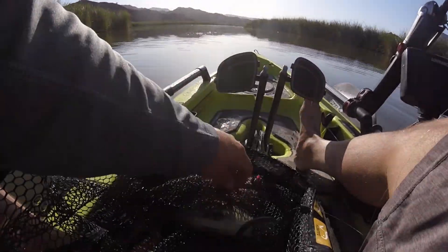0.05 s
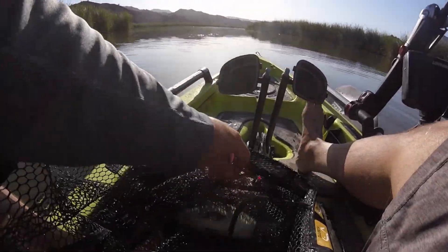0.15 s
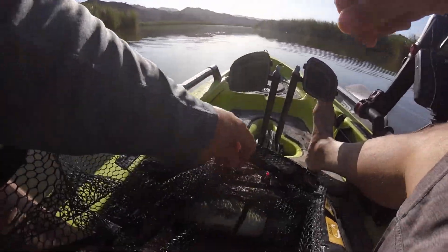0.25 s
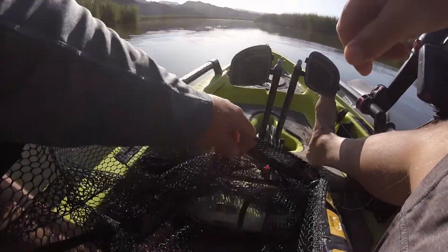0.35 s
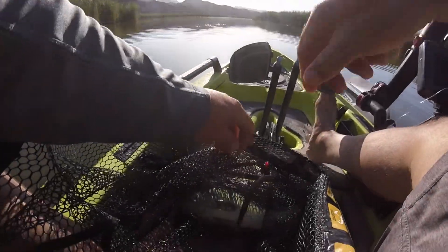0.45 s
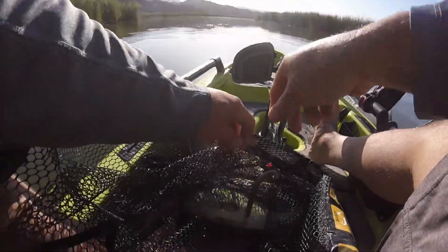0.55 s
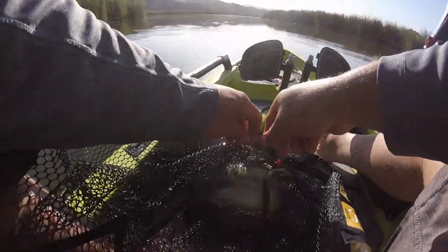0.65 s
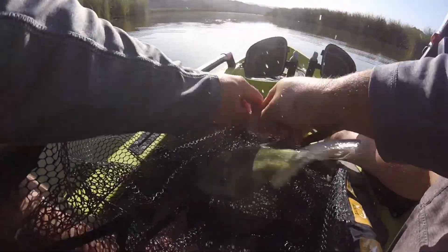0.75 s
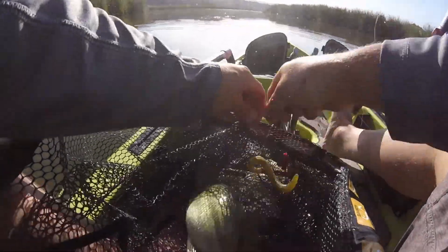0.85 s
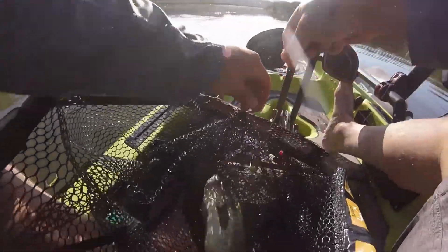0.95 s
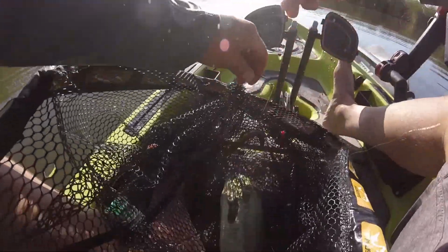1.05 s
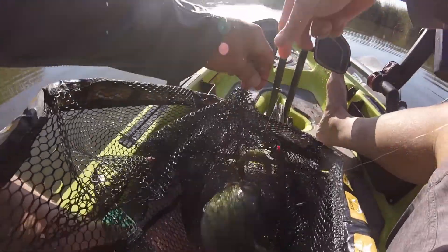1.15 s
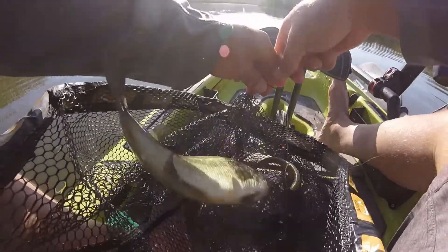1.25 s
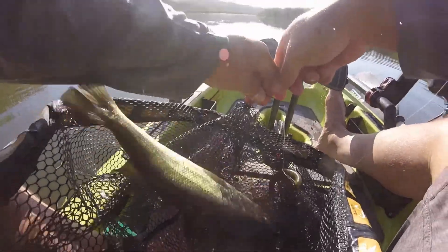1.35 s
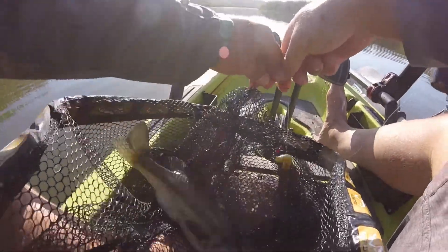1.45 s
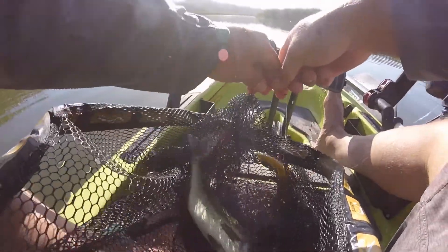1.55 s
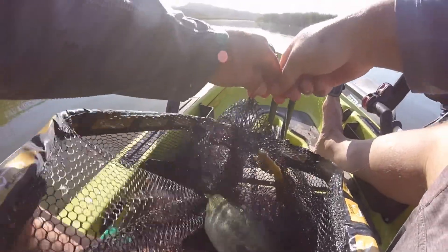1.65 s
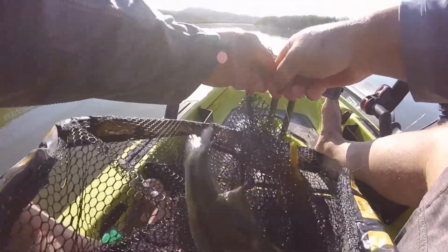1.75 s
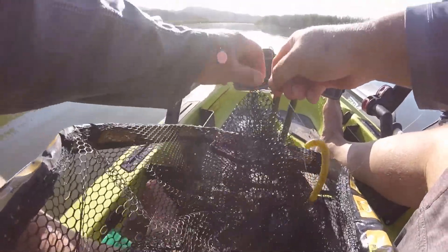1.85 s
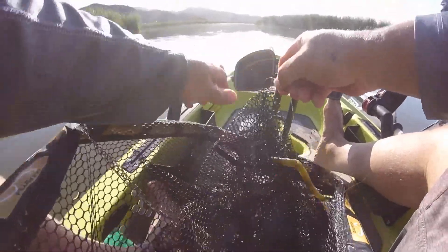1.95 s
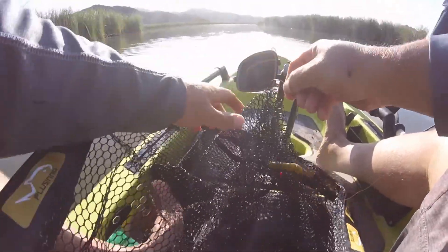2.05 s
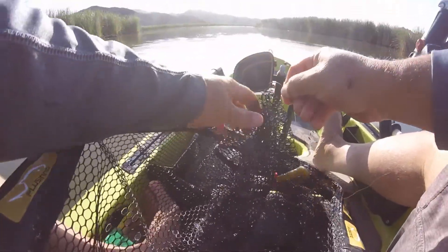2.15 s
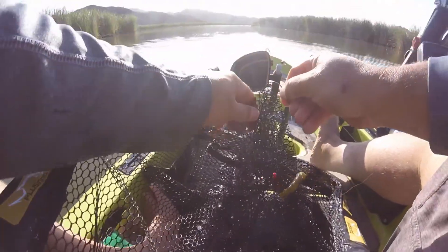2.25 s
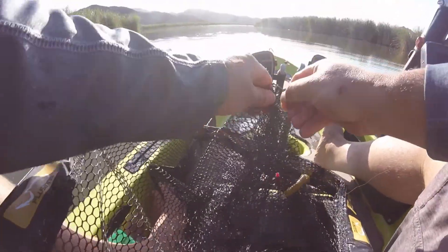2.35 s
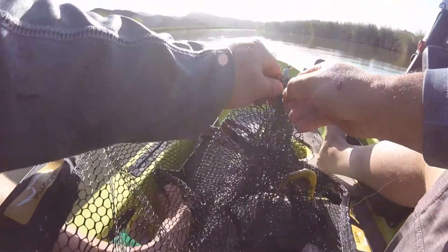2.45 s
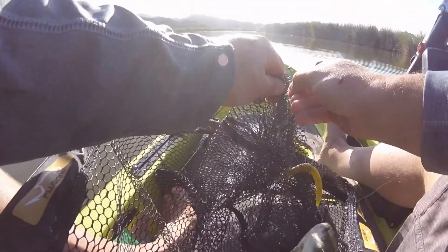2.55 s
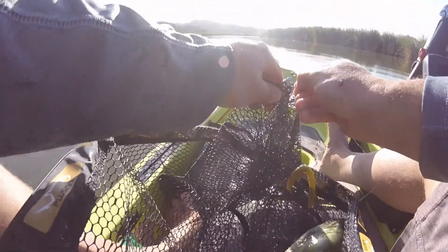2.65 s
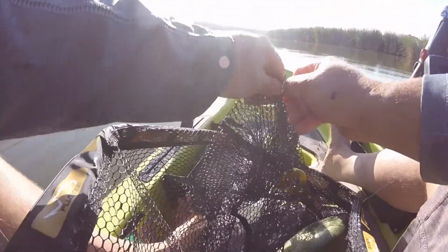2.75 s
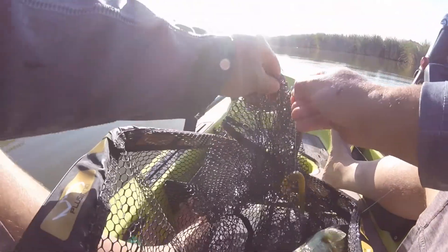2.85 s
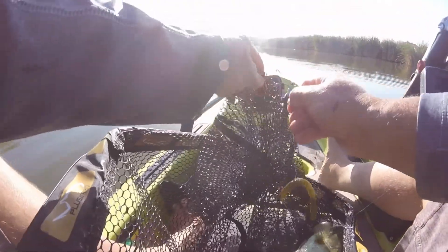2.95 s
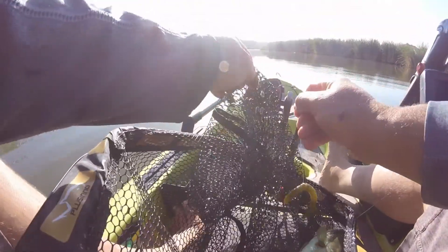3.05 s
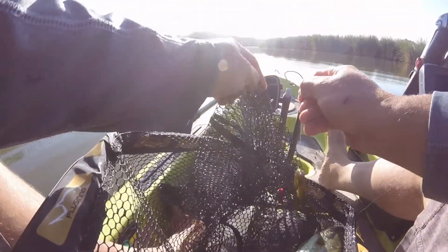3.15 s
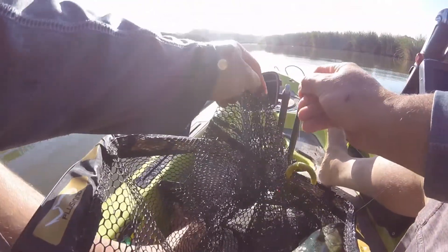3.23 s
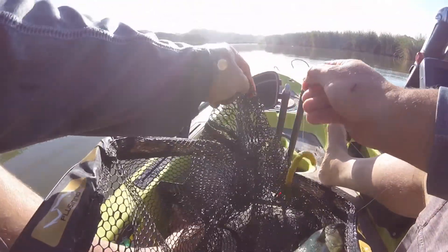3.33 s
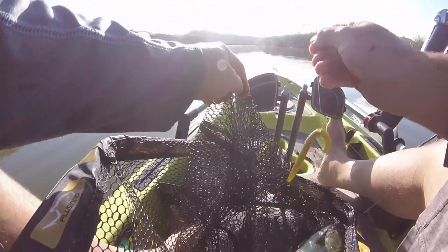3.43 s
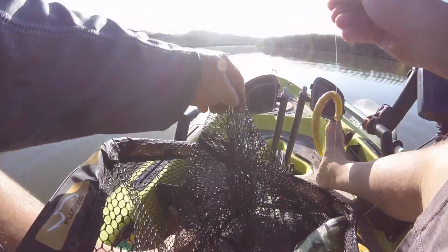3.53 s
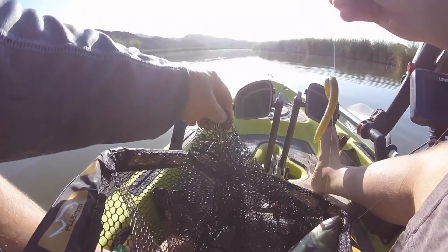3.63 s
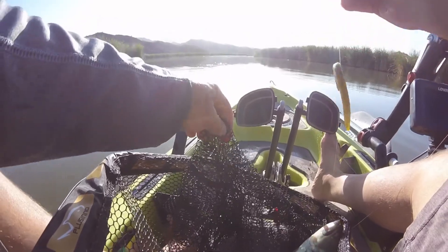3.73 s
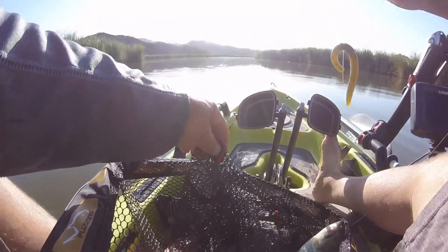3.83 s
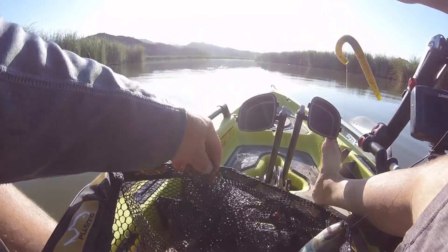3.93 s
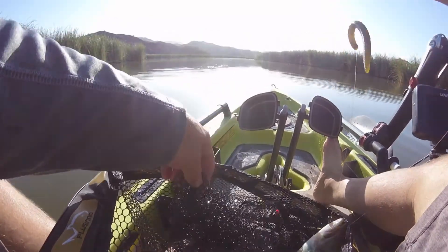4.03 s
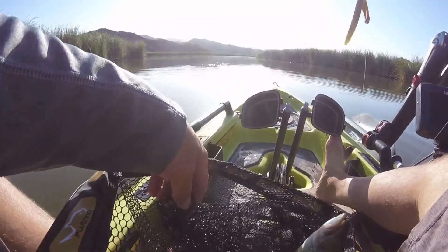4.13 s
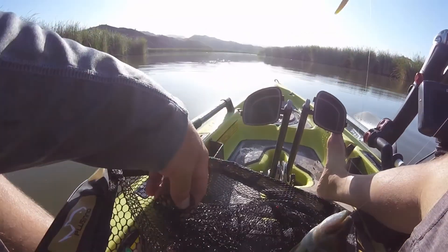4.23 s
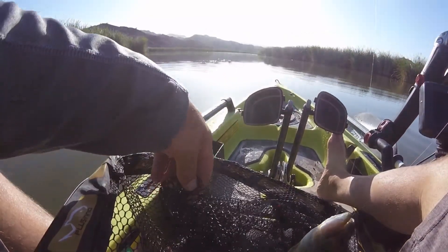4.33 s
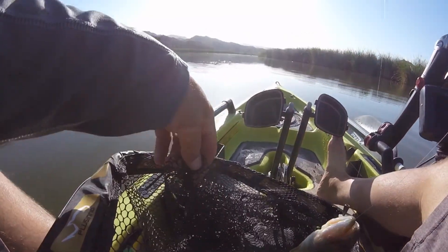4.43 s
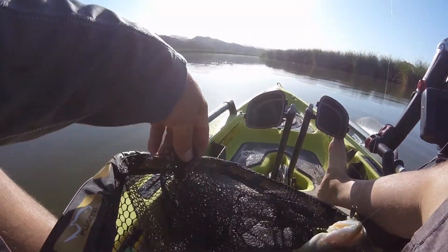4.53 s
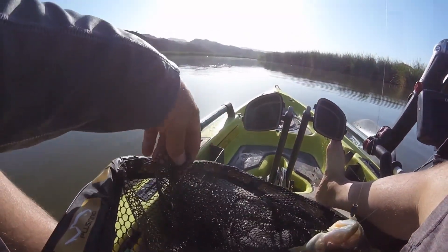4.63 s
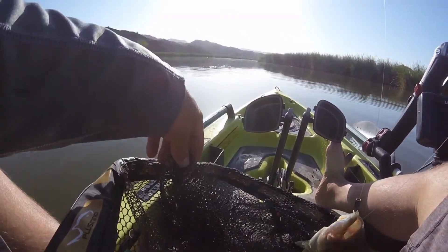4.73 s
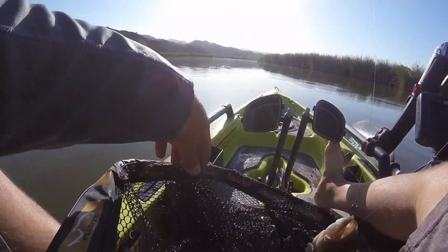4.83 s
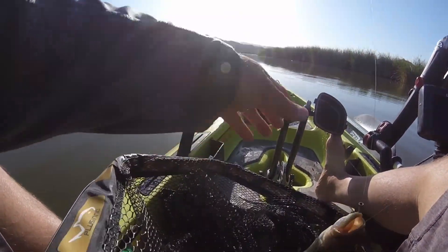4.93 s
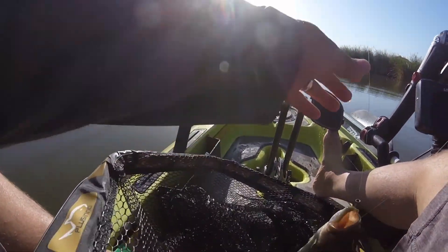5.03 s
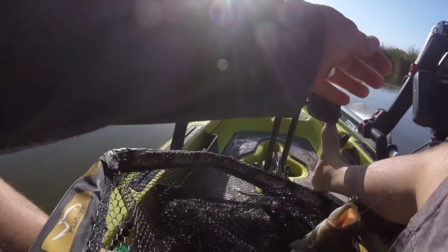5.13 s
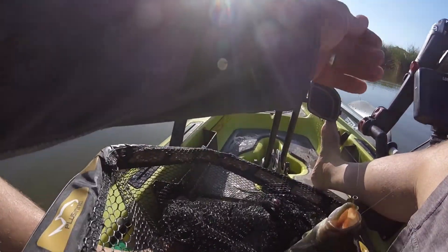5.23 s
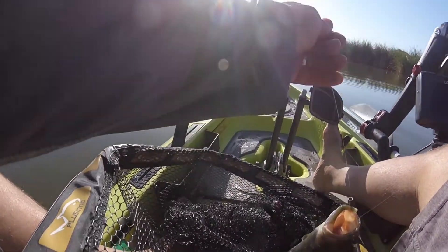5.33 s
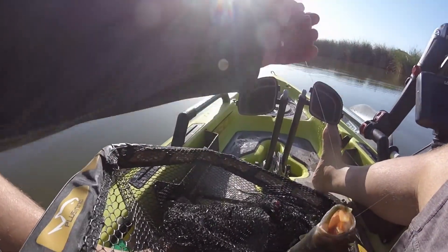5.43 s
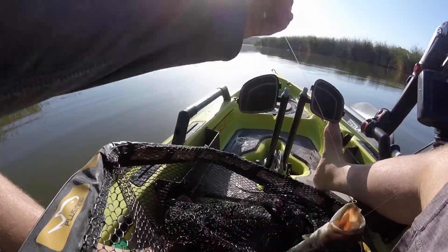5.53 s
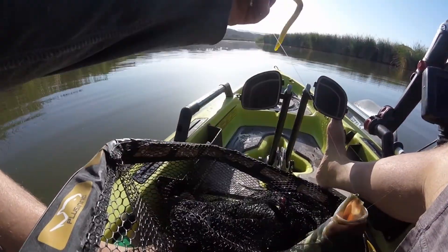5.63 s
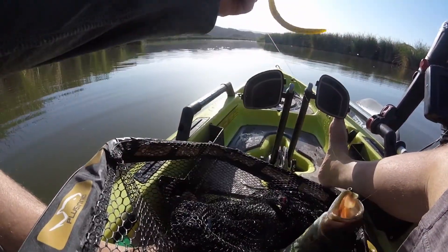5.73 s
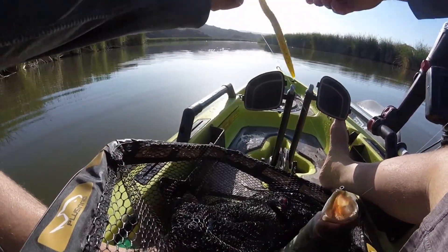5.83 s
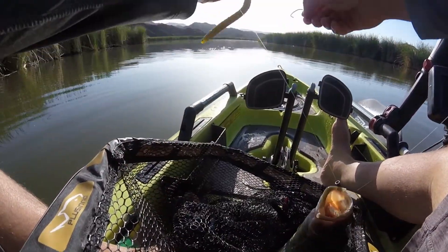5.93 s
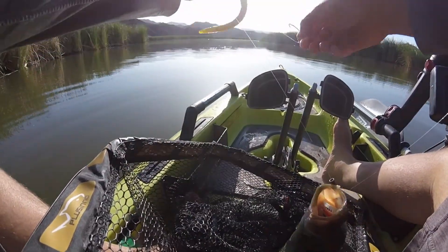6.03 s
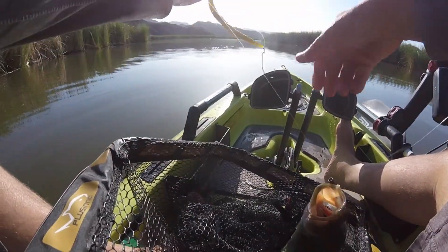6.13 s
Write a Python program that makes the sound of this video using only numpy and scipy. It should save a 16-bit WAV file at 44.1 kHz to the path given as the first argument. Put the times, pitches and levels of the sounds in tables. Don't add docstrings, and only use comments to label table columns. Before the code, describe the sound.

Outdoors on calm water, a close microphone in a sealed housing gives a dull, bass-heavy sound with faint hiss, low wind rumble and rocking wash throughout. For the first 0.7 s there is mainly this bed, quiet net rustle and faint taps. At 0.76 s a fish slams the hollow plastic hull: hard knock, wet slap, short low boom and snapping mesh. More blows follow at about 0.95, 1.07, a very hard one at 1.26, then 1.59 and 1.77, with scuffing and wet netting crackle between. Heavy thuds come near 2.05 s, lighter flaps at 2.35 to 2.55, and a great double slam at 2.73 to 2.76. Afterwards it is calm: sparse ticks, soft mesh drag, and water gurgling around 3.2 to 3.7 s. A softer flop and scrabble land at 4.9 to 5.2 s, then rounder glugs and gusty wind continue to the end at about 6.2 s.

```python
import sys
import numpy as np
from scipy import signal
from scipy.fft import rfft, irfft
from scipy.io import wavfile
from scipy.ndimage import uniform_filter1d, minimum_filter1d

SR = 44100
rng = np.random.default_rng(int(sys.argv[2]) if len(sys.argv) > 2 else 0)


def undo_db(level):
    steps = np.asarray(level, float) / 20
    return 10 ** steps


def transcribe(signal):
    frames = np.atleast_2d(signal).T
    limited = np.clip(frames, -1, 1)
    pcm = np.round(limited * 32767).astype(np.int16)
    wavfile.write(sys.argv[1], SR, pcm)


N = 272582


def unit(x):
    return x / np.sqrt(np.mean(x ** 2))


def add(track, s, sound):
    i = int(s * SR)
    track[i:i + len(sound)] += sound[:N - i]


def peaked(x, db):
    return x * undo_db(db) / np.max(np.abs(x))


def ring(x, hz, t60):
    radius = np.exp(-np.log(1000) / (max(t60, .002) * SR))
    turn = 2 * np.pi * hz / SR
    return signal.lfilter([np.sin(turn)], [1, -2 * radius * np.cos(turn), radius * radius], x)


def resonate(x, hz, width):
    return signal.lfilter(*signal.iirpeak(hz, hz / width, fs=SR), x)


def steep(x, hz, kind):
    return signal.sosfilt(signal.butter(7, hz, kind, fs=SR, output="sos"), x)


def walk(rate):
    hold = int(SR / rate)
    steps = np.repeat(rng.standard_normal(N // hold + 1), hold)
    return unit(uniform_filter1d(uniform_filter1d(steps, hold), hold)[:N])


def curve(table):
    s, db = np.transpose(table)
    return np.interp(np.arange(N) / SR, s, db)


def burst(seconds, ms, rise_ms, scatter_db):
    noise, scatter = rng.standard_normal((2, int(SR * seconds)))
    t = np.arange(len(noise)) / SR * 1000
    rise = 1 - np.exp(-t / max(rise_ms, .05))
    return noise * undo_db(scatter_db * scatter) * rise * np.exp(-t / max(ms, .1))


# (f/Hz, width/Hz, level/dB)
HOUSING_MODES = [
    (1488, 347, 9.5),
    (2504, 350, 5),
    (3300, 960, -0.5),
    (3730, 514, 6.5),
    (5260, 1050, 1),
    (5950, 1340, 2.5),
    (7430, 1300, -5.5),
    (9870, 1400, 5.5),
    (11080, 1540, 5),
    (12900, 1800, 1),
]


def housing(x, dull_db=0., bright_db=0., top_db=0., throat_db=0.):
    share_db = np.repeat([dull_db, throat_db, 0, bright_db, top_db], [1, 1, 2, 3, 3])
    out = 0
    for k, (hz, width, db) in enumerate(HOUSING_MODES):
        leak = resonate(resonate(x, hz, width), hz, 4.9 * width)
        out = out + (-1) ** k * undo_db(db + share_db[k]) * leak
    return out


# (t/s, level/dB)
BREEZE = [(0, -9), (.33, -4), (.62, -5.5), (.95, -2), (1.2, -4.5), (2.22, -0.5), (2.67, -2.5), (2.82, -6.5),
          (3.2, -1.5), (4.44, 1.5), (4.77, -1), (5.3, 3), (5.87, -2), (6.18, -1)]
# (t/s, level/dB)
ROCKING = [(0, 0.5), (.76, -1.5), (.88, 12.5), (1.36, 4), (1.58, 3.5), (1.7, 9.5), (2.08, 0.5), (2.22, 8.5),
           (2.67, 6.5), (3.01, 4), (3.2, 4.5), (3.5, 1), (4.06, 1.5), (4.44, 2), (4.77, 2), (5.06, 4.5),
           (5.3, 1), (6.18, 4.5)]
# (f/Hz, level/dB per Hz)
AIR_COLOUR = [(15, -30.5), (25, -3.5), (45, 1), (154, -11), (205, -11), (320, -20), (425, -17.5),
              (485, -22.5), (552, -22), (697, -20), (859, -12), (1480, -43), (3590, -52), (12500, -65),
              (16200, -99), (22000, -120)]
# (f/Hz, level/dB)
WHINE = [
    (9652, -93),
]


def lake():
    breeze_db, rocking_db = curve(BREEZE), curve(ROCKING)
    rumble_db = -40 + 0.82 * breeze_db + rocking_db
    wash_db = -44 + 0.49 * breeze_db + 0.39 * rocking_db
    hum_db = -45 + breeze_db
    hiss_db = -64
    f = np.fft.rfftfreq(N, 1 / SR) + 1e-9
    colour_hz, colour_db = np.transpose(AIR_COLOUR)
    colour = undo_db(np.interp(np.log(f), np.log(colour_hz), colour_db))
    # (low f/Hz, high f/Hz, level/dB, flicker/dB, flickers per s)
    layers = [(11.33, 120, rumble_db, 2.3, 12), (121.3, 650, wash_db, 2.45, 18),
              (641, 1300, hum_db, 1.1, 14), (1314, 14000, hiss_db, 0.24, 19)]
    out = np.zeros(N)
    for low, high, db, flicker_db, rate in layers:
        edges = np.geomspace(low, high, num=4)
        layer = np.zeros(N)
        for a, b in zip(edges, edges[1:]):
            band = irfft(rfft(rng.standard_normal(N)) * colour * (f >= a) * (f < b), N)
            layer += band * undo_db(flicker_db * walk(rate))
        out += unit(layer) * undo_db(db)
    for hz, db in WHINE:
        out += np.sqrt(2) * undo_db(db) * np.sin(2 * np.pi * hz * np.arange(N) / SR)
    return out


# (t/s, peak level/dB, f/Hz, length/ms)
GLUGS = [(3.452, -25, 206, 42), (3.576, -23.5, 207, 50), (3.686, -34, 193, 63), (4.535, -30.5, 199.2, 51),
         (5.421, -25, 181.5, 60), (5.542, -21, 176.6, 57), (5.733, -36.5, 178, 44), (5.981, -31.5, 185, 56),
         (6.142, -21, 195, 24), (0.08, -34, 429, 67), (0.175, -30.5, 408, 17), (3.192, -30.5, 401, 35),
         (3.343, -29, 398, 41), (3.973, -42, 476, 37), (4.1, -33, 425, 23), (4.248, -29, 560, 22),
         (5.302, -31.5, 412, 22), (5.432, -33, 395, 24), (5.816, -27, 343, 12), (5.976, -29, 536, 18),
         (6.117, -29, 549, 53)]


def glugs():
    out = np.zeros(N)
    for s, db, hz, ms in GLUGS:
        t = np.arange(SR // 4) / SR * 1000 / ms
        swell = t * np.exp(-3.5 * t)
        tone = np.sin(2 * np.pi * hz * ms / 1000 * t * (.97 + 0.059 * t))
        add(out, s, peaked(swell * tone, db - 8.5))
    return out


# (t/s, level/dB)
DRAG = [(0.0, -64.5), (0.72, -61.5), (0.96, -51), (1.17, -53), (1.31, -54), (1.86, -62.5), (2.22, -54),
        (2.63, -60.5), (2.77, -76), (3.79, -59.5), (4.37, -68), (5.03, -57), (5.42, -66), (6.01, -70),
        (6.18, -71)]
# (t/s, level/dB, length/ms, bright part level/dB)
SPRAY = [(.24, -65, 150, -6), (0.744, -51, 12, -12), (.765, -56, 46, -1), (0.824, -67, 50, 20),
         (.96, -61.5, 33, 1), (1.12, -59.5, 32, -13), (1.274, -48, 40, 1), (1.595, -63.5, 65, -3),
         (1.765, -60.5, 46, 5), (1.799, -56.5, 36, -3), (2.03, -67.5, 64, -7), (2.181, -58, 30, -3),
         (2.341, -70, 49, 4), (2.46, -65, 140, 1), (2.53, -71, 230, 0), (2.728, -65, 58, -7),
         (4.55, -66, 110, -7)]


def mesh():
    ticks = rng.standard_normal(N) * undo_db(2.1 * rng.exponential(size=N)) * undo_db(2.4 * walk(200))
    out = unit(housing(ticks, -1.0, -1.7, -17.5)) * undo_db(curve(DRAG) - 11.0)
    for s, db, ms, bright_db in SPRAY:
        shaken = ticks[int(s * SR):][:int(ms * SR / 1000)]
        swell = np.sin(np.pi * np.linspace(0, 1, len(shaken)) ** 0.58)
        add(out, s, undo_db(db) * unit(housing(shaken * swell, -3.5, bright_db, bright_db - 16.5)))
    return out


# (t/s, peak level/dB, f/Hz, length/ms)
POPS = [(0.7573, -23.5, 2500, 1.65), (.7595, -30, 6000, 2.9), (.780, -43, 3700, 6.1),
        (.953, -37, 2600, 1.9), (1.1144, -33.5, 5500, 1.6), (1.2603, -40, 5900, 3.1),
        (1.285, -35.5, 3900, 3.6), (1.290, -40, 5900, 2.6), (1.2975, -40, 2500, 3.1),
        (1.301, -41, 3700, 3.1), (1.531, -36, 5350, 2.3), (1.533, -33, 3800, 1.9),
        (1.977, -36.5, 3150, 2.4), (1.977, -35, 5600, 2.5), (2.1856, -46, 2430, 2.6),
        (2.185, -47, 6000, 2.6), (2.196, -50, 5900, 1.9), (2.196, -47, 3700, 1.6), (2.203, -45, 3700, 1.4),
        (2.212, -49, 3600, 1.4), (2.226, -50, 3200, 1.6), (2.235, -55, 3000, 1.4), (2.2503, -44, 6550, 1),
        (2.350, -45.5, 2470, 1.6), (2.4312, -50, 2230, 1.9), (2.464, -52, 2430, 2.1),
        (2.4803, -44, 2360, 2.6), (2.5355, -38, 3700, 1.8), (2.5355, -39, 5960, 1.1),
        (2.540, -45, 1550, 4.1), (2.552, -48, 3300, 2.1), (2.5674, -50, 6800, 1.1),
        (2.757, -30.5, 5900, 1.4), (2.762, -35, 2580, 2.5), (2.7715, -52, 5200, .6),
        (2.7715, -52, 3000, .8), (2.823, -49, 2700, 1.6), (2.947, -59, 6200, 1.1), (3.206, -42, 3650, 1.6),
        (4.7915, -41, 3600, .7), (4.7915, -44, 2700, .9), (4.7915, -41, 3200, .9), (4.897, -50, 3620, 2.1),
        (5.103, -51, 3400, .9), (5.103, -53, 4300, .9), (5.103, -47, 1500, 1.6), (1.766, -41, 2600, 3.6),
        (1.835, -44, 3800, 3.1), (1.828, -47, 5500, .8), (1.115, -41, 3600, 1.6), (1.133, -45, 3500, 4.1)]


def pops():
    out = np.zeros(N)
    for s, db, hz, ms in POPS:
        width = 0.16 * hz
        snap = burst(1 / 20, ms, rise_ms=0.25, scatter_db=2.0)
        add(out, s, peaked(resonate(resonate(snap, hz, width), hz, 2.3 * width), db))
    return out


# (t/s, peak level/dB, dull part level/dB, bright part level/dB)
KNOTS = [(.4274, -53, -1, -22), (.829, -57, 6, -3), (.9844, -57, -8, -9), (1.0709, -44.5, -13, -2),
         (1.1139, -47, 3, -2), (1.1608, -45, -7, -10), (1.1904, -62, -7, 7), (1.2024, -64, -2, -1),
         (1.5314, -27, -1, -1), (1.7394, -60, 0, 4), (1.8332, -47, -7, -16), (1.9634, -47.5, 2, -13),
         (2.0293, -54, -15, -8), (2.136, -51, -14, -6), (2.2024, -45, -16, 0), (2.2493, -51.5, -11, 1),
         (2.3344, -51, -14, -10), (2.3426, -51, -10, -5), (2.4324, -57, 4, -15), (2.4872, -47, -13, -19),
         (2.4972, -42, -18, -17), (2.5277, -34.5, -22, -14), (2.5356, -43.5, -10, -1.5),
         (2.5674, -53, 2, -6), (2.6434, -46.5, -14, -25), (2.7571, -35, 0, 2), (2.7714, -70, -9, -9)]
# (t/s, peak level/dB, dull part level/dB, bright part level/dB, top end level/dB)
DROPS = [(2.822, -48.5, -25, -6, -22), (2.9113, -61, -6, -4, -10), (3.1257, -44.5, -10, -2, -20),
         (3.1785, -56, 4, -2, -14), (3.2053, -38, -20, -10, -10.5), (3.2285, -47, -6, -8, -24),
         (3.418, -54, -5, -9, -25), (3.468, -60, 9, 0, -20), (3.9105, -54.5, -1, -9, -9),
         (4.0753, -57, 2, -9, -19), (4.371, -53, 6, -15, -25), (4.6219, -53, -14, -20, -28),
         (4.7904, -38, -17, -17, -33), (4.894, -44, -1, -7, -37), (5.1023, -58, 14, -1, -24),
         (5.9714, -55.5, -11, -2, -24)]


def ticks():
    out = np.zeros(N)
    rows = [(*row, -25, -2.5) for row in KNOTS] + [(*row, -0.5) for row in DROPS]
    for s, db, dull_db, bright_db, top_db, throat_db in rows:
        tick = burst(1 / 20, ms=2.3, rise_ms=0.17, scatter_db=2.5)
        add(out, s, undo_db(db + 5.0) * housing(tick, dull_db + 0.5, bright_db + 1.5, top_db, throat_db))
    return steep(out, 1130, "high")


# (t/s, peak level/dB)
RAPS = [(0.757, -36), (.986, -41), (1.117, -25), (1.149, -37), (1.262, -28.5), (1.289, -33), (1.534, -34),
        (1.838, -23.5), (2.076, -40), (2.385, -30), (2.432, -36.5), (2.528, -32), (3.42, -43),
        (4.897, -30.5), (4.965, -38), (5.0, -46)]


def raps():
    out, cavity_hz = np.zeros(N), 923
    for s, db in RAPS:
        tap = burst(1 / 10, ms=3.2, rise_ms=0.34, scatter_db=1.5)
        add(out, s, peaked(resonate(ring(tap, cavity_hz, t60=0.03), cavity_hz, 700.), db))
    return out


# (t/s, peak level/dB, dull part level/dB, bright part level/dB, top end level/dB)
SLAPS = [(.757, -23.5, -24, -12, -17), (0.9514, -29.5, -16, -14.5, -22), (1.259, -29, -10, -11, -17),
         (1.321, -41, -17, -9, -20), (1.5875, -34.5, -4, -9.5, -20), (1.7618, -43, -4, -13, -20),
         (1.7913, -23, -3.5, -8, -25), (1.9759, -35, 6.5, -6, -25), (2.348, -42.5, -12, -7.5, -21),
         (2.4797, -43, 2.5, -25, -21), (2.725, -40, -17, -7.5, -21)]


def slaps():
    out = np.zeros(N)
    for s, db, dull_db, bright_db, top_db in SLAPS:
        spatter = burst(1 / 10, ms=4.6, rise_ms=0.85, scatter_db=4.5)
        add(out, s, undo_db(db + 1.5) * housing(spatter, dull_db, bright_db + 8.5, top_db))
    return steep(out, 1130, "high")


# (f/Hz, level/dB, fade by 60 dB t/s)
SHELL = [
    (130, -5.5, 0.058),
    (199.2, 2, 0.053),
    (275, 7.5, 0.083),
    (365, 2, 0.049),
    (448, -6, 0.11),
    (567, 1, 0.03),
    (705, 21, 0.029),
    (838, 7.5, 0.07),
    (911, 10, 0.076),
    (960, -33, .04),
]
# (t/s, peak level/dB, low modes level/dB, high modes level/dB)
KNOCKS = [(.055, -28.5, -34, -16), (.539, -33.5, -5.5, -12), (.681, -35, -4, -24), (.707, -38, -3, -20),
          (.759, -19, -5, -16), (.829, -34, 7.5, -10), (.952, -17, -7.5, -4.5), (.985, -33.5, -13, 0.5),
          (1.071, -16.5, -7, -22), (1.260, -12, -19, -5), (1.532, -31.5, -28, 11), (1.589, -16.5, -6.5, 2),
          (1.791, -27.5, -4, 12), (2.384, -33.5, -15, 3.5), (2.433, -40, -14, -8), (2.528, -26, -40, -0.5),
          (3.419, -35.5, -8, 2.5), (4.243, -43, -19, 3), (4.998, -27, -3, -26), (5.021, -26, -5.5, -0.5),
          (5.171, -32.5, 0.5, 6)]
# (t/s, peak level/dB, low modes level/dB, high modes level/dB, scrabble/ms)
SCUFFS = [(1.114, -23.5, -16, 0, 10.7), (1.148, -29.5, -7, -5, 3.1), (1.285, -22.5, -2, -3.5, 6.3),
          (1.809, -37, -20, 15, 18.4), (1.836, -27.5, -26, 10.5, 4), (1.977, -25, -6, 4, 7),
          (2.041, -19, 0.5, -30, 14.5), (2.077, -22, -3, -24, 4.6), (2.19, -25, -19, -16, 5.7),
          (2.479, -22.5, -13, -17, 39), (2.547, -26.5, 2.5, -15, 14), (4.890, -14.5, -4, -30, 7.4),
          (4.913, -20.5, -18, -10, 13), (4.939, -26.5, -7, -17, 45)]
# (t/s, peak level/dB, low modes level/dB, high modes level/dB, scrabble/ms)
SLAM = [
    (2.726, -18.5, -3, -29, 9.1),
    (2.7569, -14, -16, -1, 1),
    (2.7623, -17, -7.5, -12, 3.1),
]


def knocks():
    out = np.zeros(N)
    blows = [(*row, 4.9, 1) for row in KNOCKS] + [(*row, 3) for row in SCUFFS] + [(*row, 1) for row in SLAM]
    for s, db, low_db, high_db, scrabble_ms, contact_ms in blows:
        blow = burst(1 / 5, scrabble_ms, contact_ms, scatter_db=2.0)
        modes = []
        for hz, mode_db, t60 in SHELL:
            share, detune = rng.standard_normal(2)
            modes.append(undo_db(mode_db + 1.8 * share) * ring(blow, hz * (1 + 0.04 * detune), t60))
        crack = ring(blow, 557.0, 0.0072)
        add(out, s, peaked(sum(modes[:2]), db + low_db + 5.0))
        add(out, s, peaked(sum(modes[2:6]), db - 3.5))
        add(out, s, peaked(crack, db - 12.5))
        add(out, s, peaked(sum(modes[6:]), db + high_db))
    return steep(out, 1017, "low")


# (t/s, peak level/dB, contact/ms, shell ring level/dB)
PUSHES_OUT = [(1.0715, -16.5, 2.2, -15), (1.2596, -4, 1.64, -9), (1.2690, -14, 2.9, -3),
              (2.7254, -13, 3.06, -14), (2.7570, -3.5, 1.8, -5), (2.7616, -5.5, 1.62, -12.5),
              (2.7640, -9, 2.1, -14), (2.7668, -9, 1.7, -14), (1.2735, -17, 2.1, -12),
              (1.2888, -20, 1.4, -6), (1.2955, -21, 1.3, -4), (1.120, -19, 1.4, -5),
              (.7665, -9.5, 3.8, -10), (.7614, -13, 1.5, -8), (1.5903, -13, 1.1, -6)]
# (t/s, peak level/dB, contact/ms, shell ring level/dB)
PUSHES_IN = [
    (.7587, -4, 1.9, -13),
    (.772, -14, 3.1, -14),
    (2.040, -12, 3.1, -12),
    (2.7581, -12, 1.3, -12),
    (2.7592, -9, 1.6, -14),
    (.9520, -11.5, 2.06, -4),
    (1.5893, -10, 1.36, -8),
    (4.8925, -14.5, 2.34, -7),
]


def pushes():
    out = np.zeros(N)
    for table, way in [(PUSHES_OUT, 1), (PUSHES_IN, -1)]:
        for s, db, ms, ring_db in table:
            t = np.arange(SR // 8) / SR * 1000 / ms
            dent = np.sin(np.pi * np.minimum(t, 1)) ** 2
            shell = sum(ring(dent, hz, 0.68 * t60) for hz, _, t60 in SHELL[1:8])
            late_shell = np.roll(shell, int(ms * SR / 2000))
            spring_back = signal.lfilter(*signal.butter(1, 90., "high", fs=SR), dent)
            add(out, s, way * (peaked(spring_back, db) + peaked(late_shell, db + ring_db)))
    return out


# (t/s, peak level/dB, fade by 60 dB t/s)
FLOPS = [(1.072, -11, .12), (1.257, -16.5, 0.13), (1.329, -32, 0.11), (1.588, -9.5, 0.15),
         (1.598, -16, .05), (2.036, -13, 0.04), (2.0508, -7, .07), (2.109, -30.5, 0.2), (2.355, -23, 0.043),
         (2.464, -25.5, 0.17), (2.541, -22.5, 0.059), (2.725, -10, 0.07), (2.736, -9, .06),
         (4.894, -28.5, 0.4), (5.171, -31.5, 0.15), (5.259, -38, .11)]
# (t/s, peak level/dB, fade by 60 dB t/s)
JERKS = [
    (.757, -20, 0.23),
    (.829, -28, 0.053),
    (.918, -22, 0.016),
    (.95, -17, 0.029),
    (1.763, -15, 0.18),
    (2.228, -18.5, 0.09),
]
# (t/s, peak level/dB, fade by 60 dB t/s)
REBOUNDS = [
    (.765, -22, .039),
    (2.7625, -7, 0.03),
]


def booms():
    out, t = np.zeros(N), np.arange(SR // 2) / SR
    lingering = 0.045 * np.exp(-np.log(1000) * t / 0.56)
    # (blows, f/Hz of the hull's air, swell/ms, first direction)
    kinds = [(FLOPS, 83.5, 6.3, 1), (JERKS, 83.5, 1.5, -1), (REBOUNDS, 86.8, 0.62, 1)]
    for table, hz, swell_ms, way in kinds:
        swell = 1 - np.exp(-t * 1000 / swell_ms)
        for s, db, t60 in table:
            fade = np.exp(-np.log(1000) * t / t60) + lingering
            swing = np.sin(2 * np.pi * hz * t + 0.84) * swell * fade
            add(out, s, way * peaked(swing, db))
    return out


def scene():
    background = lake() + glugs()
    net = mesh() + pops() + ticks()
    fish = raps() + slaps() + knocks() + pushes() + booms()
    return (background + net + fish)[None]


def band_limit(x):
    return signal.sosfilt(signal.butter(12, 16340, fs=SR, output="sos"), x)


def record(dry):
    ceiling = .7
    duck = minimum_filter1d(np.minimum(1, ceiling / (np.abs(dry) + 1e-9)), size=201)
    limited = dry * uniform_filter1d(duck, size=201)
    f, _, z = signal.stft(limited, SR, "cosine", 2048)
    faint = (uniform_filter1d(np.abs(z), size=2, axis=1) < undo_db(-103)) & (f[:, None] > 5100)
    thinned = signal.istft(np.where(faint, z * undo_db(-14), z), SR, "cosine", 2048)[1][:, :N]
    dither = steep(rng.standard_normal(dry.shape), 15500, "low") * undo_db(-99)
    return band_limit(thinned + dither)


dry = scene()
out = record(dry)
transcribe(out)
```